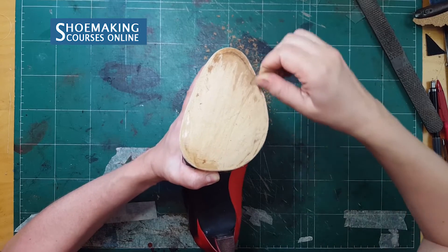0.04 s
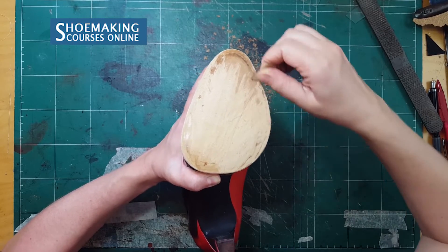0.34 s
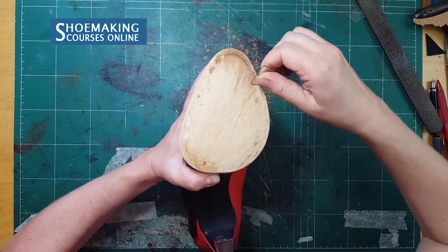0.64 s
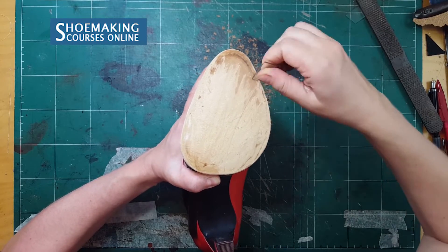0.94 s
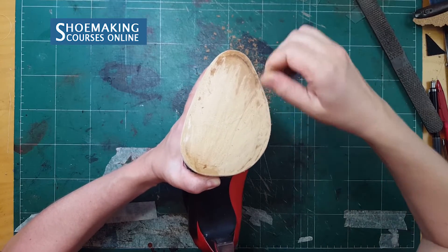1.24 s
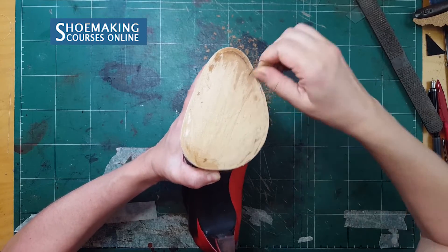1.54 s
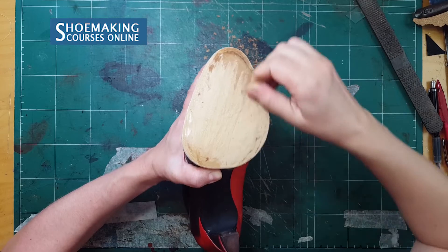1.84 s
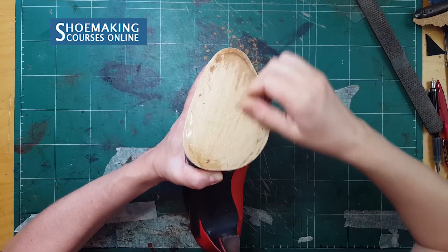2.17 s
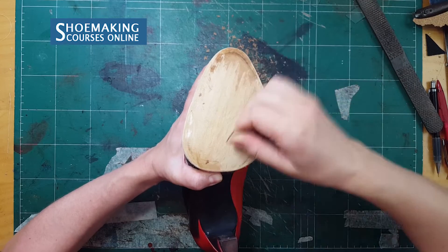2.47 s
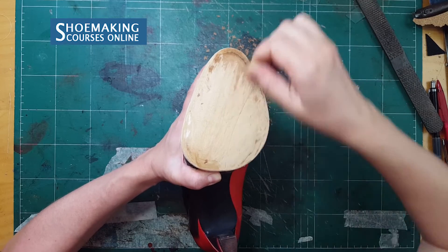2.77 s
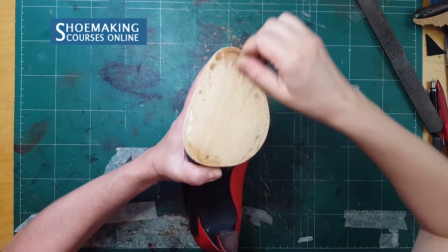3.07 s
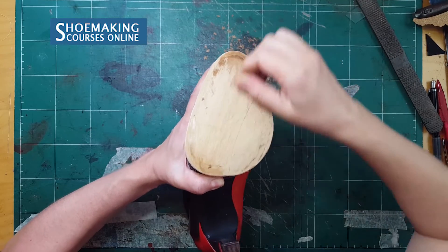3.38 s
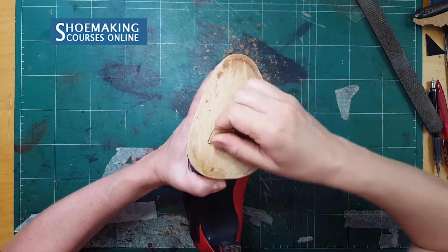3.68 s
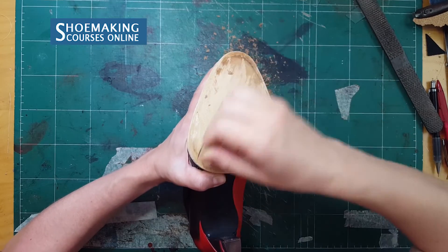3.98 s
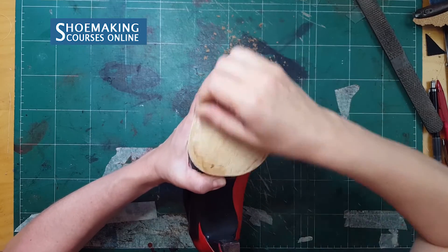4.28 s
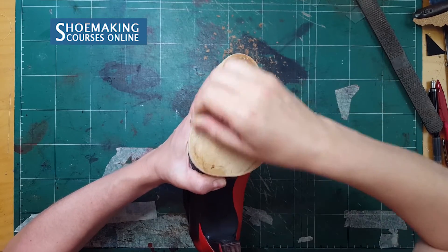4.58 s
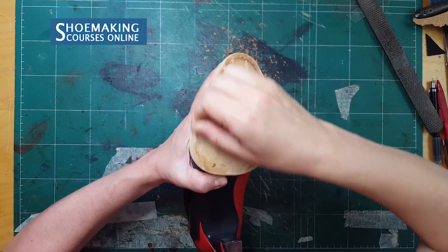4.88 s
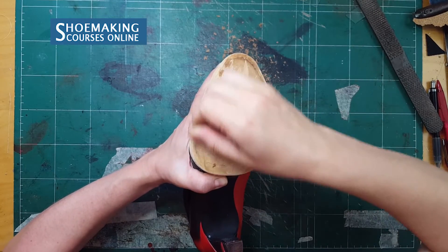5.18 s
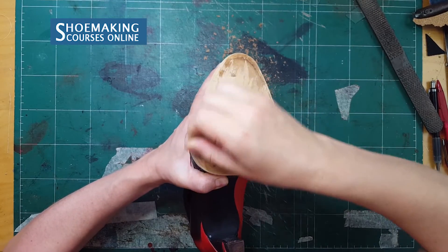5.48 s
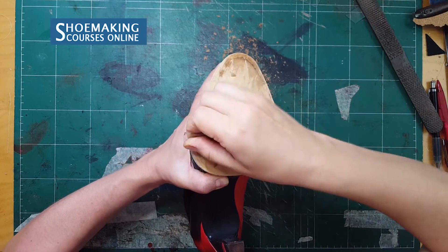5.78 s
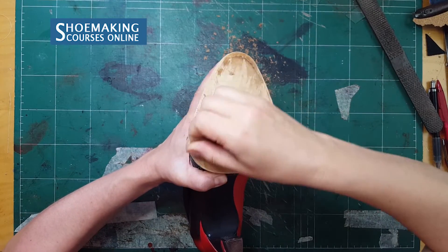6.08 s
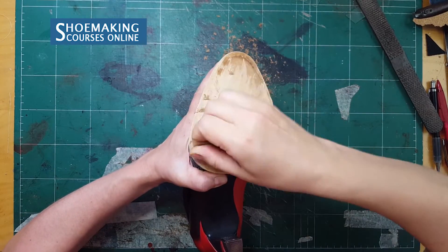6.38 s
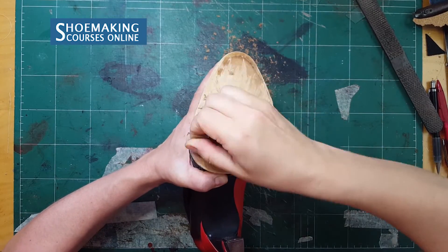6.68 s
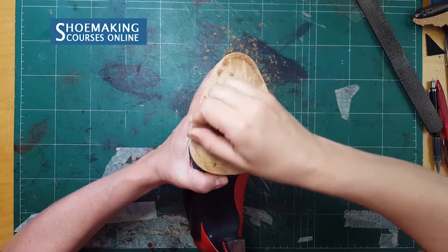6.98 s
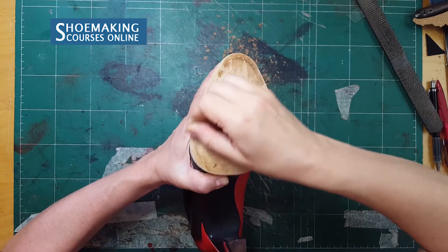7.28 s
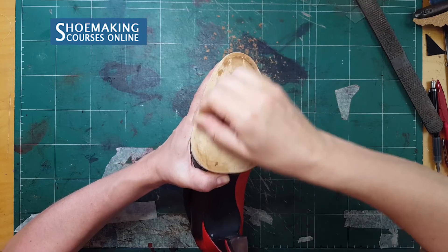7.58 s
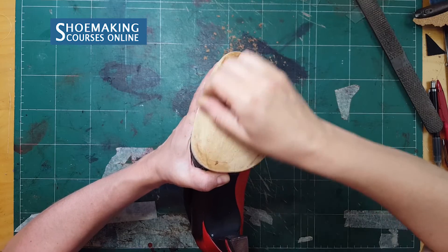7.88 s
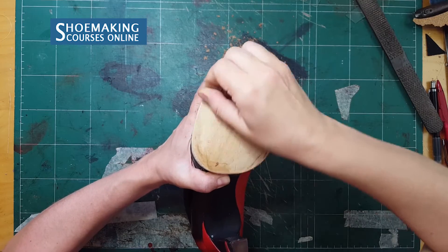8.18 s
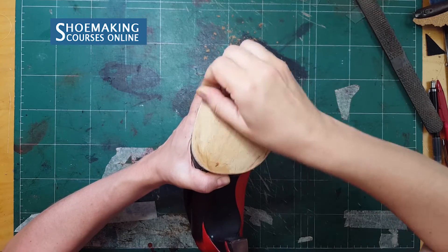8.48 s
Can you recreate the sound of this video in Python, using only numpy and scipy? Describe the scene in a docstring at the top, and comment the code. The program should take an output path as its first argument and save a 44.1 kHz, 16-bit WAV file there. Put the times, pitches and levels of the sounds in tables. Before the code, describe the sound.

Steady hand sanding of a shoe sole in a quiet workshop, about three short, gritty scrapes a second, each landing with a soft knock.

```python
"""In a quiet workshop, a small abrasive pad strokes the sole of a hand-held shoe about three times a second.
Each stroke lands with a tap and a thump. The grit bites and rasps as its grains catch and let go,
friction shakes the shoe, and the shoe springs back as the pad lifts off. The work moves from short
strokes at the toe to long ones down the edge, then onto the flat face of the sole."""
import sys
import numpy as np
from scipy import signal
from scipy.fft import rfft, irfft, next_fast_len
from scipy.io import wavfile
from scipy.ndimage import uniform_filter1d

SR = 44100
rng = np.random.default_rng(int(sys.argv[2]) if len(sys.argv) > 2 else 0)


def int16_out(signal):
    """Quantize to a 16-bit WAV file."""
    q = np.round(np.clip(np.atleast_2d(signal).T, -1, 1) * 32767)
    wavfile.write(sys.argv[1], SR, q.astype(np.int16))


N = 380583
TIME = np.arange(N) / SR
HZ = np.maximum(np.fft.rfftfreq(N, 1 / SR), 1)

# The strokes. Each row: landing time in seconds, tap strength in dB, thump strength in dB,
# time the grit bites in seconds, rub length in seconds, rasp strength in dB,
# pressure gained along the rub in dB, rebound strength in dB.
STROKES = [(0.002, -32, -50.5, 0.017, 0.1, -34, 0, -43.5), (0.297, -29.5, -46, 0.33, 0.09, -31.5, 0, -46),
           (0.584, -61.5, -56, 0.6238, 0.07, -37, 4, -41.5),
           (0.867, -49, -49.5, 0.9027, 0.088, -34.5, 0, -32),
           (1.154, -34.5, -44, 1.186, 0.092, -35, 5, -40),
           (1.434, -22, -44.5, 1.4677, 0.13, -33.5, -5.5, -47),
           (1.792, -37, -51.5, 1.818, 0.17, -34.5, 2.5, -75),
           (2.178, -21, -48.5, 2.209, 0.16, -31.5, 0.5, -55),
           (2.570, -28, -46.5, 2.608, .165, -30.5, 2, -49), (2.968, -20.5, -49, 2.995, 0.16, -29, 1, -40.5),
           (3.362, -14.5, -45, 3.389, 0.14, -27, 1, -41), (3.748, -23.5, -46, 3.784, 0.12, -29.5, 2.5, -42),
           (4.108, -26.5, -47.5, 4.135, 0.13, -34, 15, -46),
           (4.460, -22, -45.5, 4.493, 0.081, -30.5, 0, -38),
           (4.744, -25.5, -45.5, 4.788, 0.1, -35.5, 2, -60),
           (5.043, -45, -45.5, 5.079, 0.09, -33, -9.5, -41.5),
           (5.309, -46.5, -46, 5.345, 0.1, -35, -3, -36), (5.591, -50.5, -42.5, 5.630, 0.09, -34.5, 1, -49),
           (5.864, -48, -46, 5.903, 0.068, -38, -7.5, -44),
           (6.147, -45.5, -43, 6.178, 0.097, -33, -1.5, -38.5),
           (6.467, -36, -46.5, 6.494, 0.11, -32.5, 0.5, -51),
           (6.754, -51.5, -52, 6.788, 0.1, -30.5, -1.5, -40),
           (7.041, -39.5, -45.5, 7.077, 0.099, -32, 5.5, -37),
           (7.343, -32.5, -43, 7.362, 0.11, -35, 5.5, -36),
           (7.605, -43, -43.5, 7.639, 0.077, -34, -2.5, -40),
           (7.867, -37.5, -43.5, 7.891, 0.098, -32.5, 1, -38),
           (8.112, -52, -49.5, 8.151, 0.084, -34.5, 4, -44),
           (8.385, -55, -45.5, 8.417, 0.11, -35, -2, -36.5)]
# The pad on toe, edge and face. Each row: boost of its resonance in dB, its fall along a stroke in
# octaves, low mids in dB, their swell along a stroke in dB, treble in dB, pitch of a medium tap in Hz.
PAD_TONE = [(3, .18, -0.5, 4, -2.5, 1550), (7, 0.77, 4.5, 2.5, -0.2, 1140),
            (3.5, 0.65, 0.5, 12, -0.4, 1080)]
# The pad's resonance shifts as the fingers change grip. Each row: time in seconds, pitch in Hz.
GRIP_PITCH = [(0, 2130), (1.2, 1750), (1.5, 2500), (3.0, 2320), (3.4, 2160), (4.4, 1770), (5.1, 1843),
              (5.4, 2707), (6.8, 2340), (7.1, 1867), (8.6, 1940)]
def rasp(place, noise, level_db, width_octaves=0.45, flicker_db=2.5, medium_rasp_db=-32.5):
    """All rubs at one place. The pad's resonance sinks along each, and the low mids fill in as it grips."""
    boost_db, fall_octaves, low_db, swell_db, treble_db, _ = PAD_TONE[place]
    out = np.zeros(N)
    for stroke in STROKES:
        bite, length, rasp_db, lean_db = stroke[3:7]
        if place_of(bite) != place:
            continue
        force = pressure(bite, length, rasp_db, lean_db)
        on = np.flatnonzero(force)
        hz, t, frames = signal.stft(noise[on], SR, nperseg=256)
        hz = np.maximum(hz, 1)[:, None]
        along = np.clip(t / length, 0, 1) - .5
        grip_hz = np.interp(bite, *np.transpose(GRIP_PITCH))
        centre_hz = grip_hz * 2 ** (-(fall_octaves - 0.04 * lean_db) * along)
        db = boost_db * np.exp(-.5 * (np.log2(hz / centre_hz) / width_octaves) ** 2)
        low_mids = low_db + swell_db * along - .5 * (rasp_db - medium_rasp_db)  # harder sounds thinner
        db = db + treble_db / (1 + (4300 / hz) ** 6) + low_mids / (1 + (hz / 1000) ** 6)
        # contact patches come and go, each with its own range of pitch
        chance = rng.standard_normal((len(hz), 160))[:, :len(t)]
        patches = uniform_filter1d(uniform_filter1d(chance, size=5, axis=0), size=4, axis=1)
        db = db + flicker_db * rms_one(patches)
        out[on] += force[on] * signal.istft(frames * from_db(db))[1][:len(on)]
    return from_db(level_db) * out


# The hand's push on toe, edge and face. Each row: bite in dB against the crest, crest time as a share
# of the rub, lift-off in dB against the crest, first tick in dB against the rasp.
HAND_PUSH = [(-5, 0.64, -4.5, -7), (-6.5, 0.21, -0.95, -13), (-6, 0.47, -5, -9)]
def pressure(bite, length, rasp_db, lean_db, rise_s=0.012, rise_db=21, fall_s=0.089, fall_db=36):
    """The pad bites quickly, rides to a crest and eases off; the hand leans in or lets up on the way."""
    bite_db, crest, lift_db, _ = HAND_PUSH[place_of(bite)]
    start, lift = bite - 0.0029, bite + length
    times = [start, start + rise_s, bite + length * np.clip(crest, .25, .95), lift, lift + fall_s]
    on = span(times[0], times[-1])
    arch = np.interp(TIME[on], times, [bite_db - rise_db, bite_db, 0, lift_db, lift_db - fall_db])
    lean = lean_db * (np.clip((TIME[on] - bite) / length, 0, 1) - .5)
    # the pad grabs once more just before it lets go, more so when the hand leans in
    grab = np.clip(0.63 * lean_db, 0, 1.5) * np.exp(-.5 * ((TIME[on] - lift + 0.019) / 0.01) ** 2)
    out = np.zeros(N)
    out[on] = from_db(rasp_db + arch + lean + grab)
    return out


# The tone of the grit at each place. Each row: frequency in Hz, relative level in dB.
TOE_COLOUR = [(400.0, -7.5), (650.0, -7.5), (1000.0, -6.5), (1400.0, -10.5), (1900.0, -4.5),
              (2300.0, -12.5), (2900.0, -9), (3700.0, -10.5), (5500.0, -14.5), (7500.0, -13.5),
              (9800.0, -21.5), (13400.0, -13), (15000.0, -28), (15900.0, -23)]
EDGE_COLOUR = [(400.0, -12.5), (650.0, -7.5), (1000.0, -6.5), (1400.0, -4.5), (1900.0, -3), (2300.0, -2),
               (2900.0, -3), (3700.0, -6.5), (5500.0, -8.5), (7500.0, -11), (9800.0, -18), (13400.0, -8.5),
               (15000.0, -20), (15900.0, -22)]
FACE_COLOUR = [(400.0, -5.5), (650.0, -10.5), (1000.0, -6), (1400.0, -6.5), (1900.0, -3), (2300.0, -4.5),
               (2900.0, -2), (3700.0, -6.5), (5500.0, -10.5), (7500.0, -12), (9800.0, -17.5),
               (13400.0, -6.5), (15000.0, -16), (15900.0, -40)]
# Where pad and sole ring at each place. Each row: pitch in Hz, width in Hz, boost in dB.
TOE_RINGS = [(517, 57, 6), (1168, 20, 8.5), (1890, 290, 6.5), (2454, 160, 8)]
EDGE_RINGS = [(522, 29, 11.2), (1150, 7.6, 7), (1535, 26, 4.2), (1930, 54, 2.6), (2800, 160, 1.33)]
FACE_RINGS = [(520, 8.77, 15), (704, 41, 5.6), (1436, 136, 11.96), (2120, 12, 4.6), (2580, 160, 1.8),
              (3200, 57, 1.9)]
def sanding():
    """The pad rasps over toe, edge and face in turn."""
    toe = rasp(0, grit(TOE_COLOUR, TOE_RINGS), level_db=-4.5)
    edge = rasp(1, grit(EDGE_COLOUR, EDGE_RINGS), level_db=-6.5)
    face = rasp(2, grit(FACE_COLOUR, FACE_RINGS), level_db=-4.5)
    return toe + edge + face


def grit(colour, rings, grains_per_s=14000, size_db=1.2, clump_db=1.66, clump_hz=150):
    """Grains catch and let go in clumps; pad and sole colour their clicks."""
    grains = (rng.random(N) < grains_per_s / SR) * rng.standard_normal(N)
    grains *= from_db(size_db * np.minimum(rng.exponential(1, N), 4) + clump_db * drift(clump_hz))
    rings_db = sum(boost / (1 + (2 * (HZ - hz) / width) ** 2) for hz, width, boost in rings)
    spectrum = rfft(grains) * from_db(at_hz(colour, HZ) + rings_db) / np.sqrt(1 + (300 / HZ) ** 6)
    return irfft(spectrum, N) / np.std(irfft(spectrum * (HZ > 900), N))  # power 1 above 900 Hz


MEDIUM_TAP_DB, BURST_SAMPLES = -26, 2048
def taps(level_db=3, octaves_per_db=0.05, cycles=11, crunch_db=-14, crunch_t60=0.043):
    """The pad slaps the sole: two short tones, higher for a harder landing, and a crunch as it beds in."""
    out = np.zeros(N)
    hit = signal.unit_impulse(BURST_SAMPLES)
    for land, tap_db, *_ in STROKES:
        hz = PAD_TONE[place_of(land)][-1] * 2 ** (octaves_per_db * (tap_db - MEDIUM_TAP_DB))
        lower = ring(hit, hz * 0.84, cycles / hz)
        upper = from_db(-3) * ring(hit, hz * 1.655, cycles / hz)
        crunch = grit_burst(hz, crunch_db, crunch_t60, cycles=7.8)
        tap = soften(lower - upper + crunch, min(2 * hz, SR / 3))  # the soft pad rounds the blow
        add_at(out, land, from_db(tap_db + level_db) * tap)
    return out


def shoe():
    """The shoe is thumped as the pad lands, shakes while it rubs and springs back as it lifts."""
    land, _, thump_db, bite, length, _, _, rebound_db = np.transpose(STROKES)
    landings = thumps(land, thump_db + 10, build_t60=0.072, upper_db=3.5)
    rebounds = thumps(bite + length, rebound_db + 2.5, build_t60=0.065, upper_db=7)
    return landings + drag() + rebounds


# Low tones stirred by each tap and rub; the boom near 129 Hz is probably the room's resonance. Each row:
# pitch in Hz, ring time in seconds, relative level in dB when thumped, relative level in dB when dragged.
LOW_TONES = [(60, 0.2, -10, -16.5), (90.6, .12, -2, -10), (129.1, 0.26, 2, -10), (201, 0.21, -6.5, -1.5),
             (263.6, 0.16, -13, 1.5), (337, 0.15, -17, -6.5), (522, 0.11, -21, -15)]
def thumps(times, levels_db, build_t60, upper_db, softness_hz=700):
    """Soft pushes on the shoe stir the low tones, which take a moment to build up."""
    out = 0
    for k, (hz, t60, db, _) in enumerate(LOW_TONES):
        push = clicks(times, levels_db + db + upper_db * (k > 2) + rng.normal(0, 1.4, len(times)))
        tone = ring(push, hz, t60) - ring(push, hz, min(build_t60, t60 / 2))
        out = out + (-1) ** k * tone
    return soften(out, softness_hz)


# How freely the held shoe shakes. Each row: time in seconds, strength in dB.
SHOE_SHAKE = [(0, -56.5), (1.2, -45), (2.3, -57), (3.8, -56), (4.2, -49), (5.1, -50), (5.6, -42),
              (6.7, -47.5), (7.2, -40), (8.6, -45.5)]
def drag(thrum_db=-4.5, boom_db=-4, hollow_db=-4, pressed_hz=355, released_hz=220):
    """Friction shakes the shoe: a low boom sounds all through a rub, and a thrum swells in later."""
    thrum, boom, hollow_hz = np.zeros(N), np.zeros(N), np.full(N, float(pressed_hz))
    for _, _, _, bite, length, *_ in STROKES:
        on = span(bite - length, bite + 2 * length)
        along = (TIME[on] - bite) / length
        shake = from_db(np.interp(bite, *np.transpose(SHOE_SHAKE)))
        thrum[on] += shake * np.interp(along, [0.05, .6, 1.1, 1.4], [0, 1, 1, 0])
        boom[on] += shake * ((along >= -0.16) & (along < 1.3))
        # the contact softens as the hand eases off, so its hollow tone sinks
        hollow_hz[on] = np.interp(along, [.45, 1.25], [pressed_hz, released_hz])
    boom_tone = np.sqrt(2) * np.sin(2 * np.pi * LOW_TONES[2][0] * TIME + 0.84 * drift(2.8))
    out = from_db(boom_db) * boom * boom_tone
    out += from_db(hollow_db) * thrum * rough_tone(hollow_hz, waver_hz=18)
    for hz, t60, _, db in LOW_TONES:
        friction = rng.standard_normal(N)
        out += from_db(db + thrum_db) * ring(thrum * friction, hz, t60) / np.std(ring(friction, hz, t60))
    return out


def groans(level_db=-11, full_lean_db=5, gripped_hz=850, released_hz=640, half_length_s=0.044):
    """Where the hand leans in, the paper sticks and slips as the rub ends: a rough, sinking groan."""
    swell, hz = np.zeros(N), np.full(N, float(gripped_hz))
    for _, _, _, bite, length, rasp_db, lean_db, _ in STROKES:
        middle = bite + length - 0.01804  # just before the pad lifts
        on = span(middle - half_length_s, middle + half_length_s)
        along = (TIME[on] - middle) / half_length_s
        strength = from_db(rasp_db) * np.clip(lean_db / full_lean_db, 0, 2) ** .5
        swell[on] += strength * np.cos(np.pi / 2 * along) ** 2
        hz[on] = np.interp(along, [-1, 1], [gripped_hz, released_hz])
    return from_db(level_db) * swell * rough_tone(hz, waver_hz=55)


# Further ticks: extra catches as the strokes at 4.79 s and 5.08 s bite, then stray grains snapping and fingers
# shifting on the pad. Each row: start in seconds, strength in dB, pitch in Hz.
FURTHER_TICKS = [(2.894, -40, 964), (4.791, -15, 1910), (5.079, -19.5, 1700), (5.923, -45, 5500),
                 (6.078, -47.5, 3980), (6.409, -46, 4460)]
def ticks(level_db=-6, t60=0.012, catch_hz=2500):
    """Tiny bursts of grit ring the pad: one as each stroke bites, extra ones at two of the bites, and a few
    strays between strokes."""
    catches = [(bite, db + HAND_PUSH[place_of(bite)][3], catch_hz) for _, _, _, bite, _, db, *_ in STROKES]
    out = np.zeros(N)
    for start, db, hz in catches + FURTHER_TICKS:
        add_at(out, start, grit_burst(hz, db + level_db, t60, cycles=3.9))
    return out


def scuffs(level_db=-60, pitch_hz=3200, t60=0.053):
    """Grit scratches lightly as the pad settles, a little louder after a harder tap."""
    out = np.zeros(N)
    for land, tap_db, *_ in STROKES:
        db = level_db + 0.18 * (tap_db - MEDIUM_TAP_DB)
        add_at(out, land, grit_burst(pitch_hz, db, t60, cycles=1.1))
    return out


# Faint squeaks on return strokes. Each row: start in seconds, length in seconds, pitch in Hz, level in dB.
PAD_SQUEAKS = [(6.976, 0.087, 2130, -66), (7.764, 0.14, 2450, -60.5)]
def squeaks(waver_hz=70):
    """The pad lightly sticks and slips: a thin, wavering whistle that swells and fades."""
    out = 0
    for start, length, hz, db in PAD_SQUEAKS:
        swell = np.sin(np.pi * np.clip((TIME - start) / length, 0, 1))
        out = out + from_db(db) * swell * np.sin(2 * np.pi * hz * TIME + 2 * drift(waver_hz))
    return out


def rustle(level_db=-83, flexes_per_s=70, size_db=3, pitch_hz=4200, t60=0.00059):
    """The abrasive paper crackles faintly in the fingers the whole time."""
    flexes = (rng.random(N) < flexes_per_s / SR) * rng.standard_normal(N)
    flexes *= from_db(size_db * np.minimum(rng.exponential(1, N), 3))
    return from_db(level_db) * rms_one(ring(flexes, pitch_hz, t60))


def moving(sound, echo_db, place_lead_us=(-12, -3.5, 24.5), wander_us=11):
    """Hand and shoe shift, so each stroke comes from a new angle and meets different reflections."""
    out = np.zeros((2, N + SR))
    edges = [0] + [round(stroke[0] * SR) for stroke in STROKES[1:]] + [N]
    for first, last in zip(edges, edges[1:]):
        # extra head start at the left microphone, in microseconds
        lead_us = place_lead_us[place_of(first / SR)] + wander_us * rng.standard_normal()
        heard = workshop(sound[first:last], echo_db, lead_us)
        out[:, first:first + heard.shape[1]] += heard
    return out[:, :N]


# The room's echo. Each row: frequency in Hz, fade time in seconds, relative level in dB,
# how alike left and right are from 0 to 1.
ROOM_ECHO = [(99, 0.36, -12.5, 0.5), (390, 0.19, -3, 0.65), (1210, 0.16, -4.5, 0), (3040, 0.2, -7.5, 0.11),
             (6900, 0.21, -7.5, 0.082), (14100, 0.23, -16, 0.085)]
# A very short smear that roughens and widens the treble, strongest near 8 kHz.
# Each row: frequency in Hz, level in dB against the direct sound.
TREBLE_SMEAR = [(200, -28), (1000, -16), (2500, -9), (4500, -4), (8000, 21), (14000, -11)]
# How much louder the left microphone is. Each row: frequency in Hz, left minus right in dB.
LEFT_LOUDER = [(60, -1), (200, 4.5), (500, 2.4), (1200, 2), (2400, 2.5), (3400, -0.5), (6000, 1.4),
               (8100, -3.5), (9600, 13), (11000, 7), (13200, 3), (15500, 17.5)]
# How far ahead the left microphone is. Each row: frequency in Hz, lead in radians.
LEFT_LEAD = [(60, -1), (2400, 0.72), (3700, 1.13), (5000, 2), (7000, 3.5), (9000, 8.5), (11000, 9.5),
             (14000, 8)]
def workshop(sound, echo_db, lead_us=0, gap_s=0.0048, smear_t60=0.037):
    """The direct sound at two microphones, with a short smear and an echo that fades band by band."""
    size = SR // 2
    t, hz = np.arange(size) / SR, np.maximum(np.fft.rfftfreq(size, 1 / SR), 1)
    mid, side = rfft(rng.standard_normal((2, size)))
    alike = np.clip(at_hz(ROOM_ECHO, hz, column=3), 0, 1)
    noise = np.sqrt((1 + alike) / 2) * mid + np.sqrt((1 - alike) / 2) * side * [[1], [-1]]
    echo = 0
    for k, (_, t60, db, _) in enumerate(ROOM_ECHO):
        band = np.interp(np.log(hz), np.log(np.array(ROOM_ECHO)[:, 0]), np.eye(len(ROOM_ECHO))[k])
        decay = from_db(-60 * t / t60) * (t > gap_s)
        echo = echo + irfft(noise * band, size) * decay / np.linalg.norm(decay) * from_db(db + echo_db)
    sides = np.array([[.5], [-.5]])
    direct = np.exp(1j * sides * (at_hz(LEFT_LEAD, hz) + 2 * np.pi * hz * lead_us / 1e6))
    smear = rng.standard_normal((2, size)) * from_db(-60 * t / smear_t60)
    smear_gain = from_db(at_hz(TREBLE_SMEAR, hz))
    early = direct + smear_gain * rfft(smear) / np.linalg.norm(smear[0])
    pair = rfft(echo) + early / np.hypot(1, smear_gain)
    pan = from_db(sides * at_hz(LEFT_LOUDER, hz))
    echo_power = from_db(at_hz(ROOM_ECHO, hz, column=2) + echo_db) ** 2
    pair *= pan / np.sqrt(np.mean(pan ** 2, axis=0) * (1 + echo_power))  # keeps the overall loudness
    lead_in = 32  # samples of room for the side that hears it first
    response = np.roll(irfft(pair, size), lead_in, axis=1)
    return signal.fftconvolve(sound[None], response, axes=1)[:, lead_in:]


# The tone of the quiet room. Each row: frequency in Hz, relative level in dB.
AIR_COLOUR = [(40, 2.5), (150, -8), (500, -25), (2000, -28.5), (8000, -19.5), (15000, -32)]
def still_air(level_db=-86.5):
    """The air makes a very faint, steady rumble and hiss."""
    spectrum = rfft(rng.standard_normal((2, N))) * from_db(at_hz(AIR_COLOUR, HZ))
    return from_db(level_db) * rms_one(irfft(spectrum, N))


def place_of(seconds, moves_s=(1.75, 4.7)):
    """Where the pad is: 0 on the toe, 1 on the edge, 2 on the face."""
    return int(np.searchsorted(moves_s, seconds))


def grit_burst(hz, db, t60, cycles):
    """A short, fading scratch of noise around one pitch."""
    noise = rms_one(ring(rng.standard_normal(BURST_SAMPLES), hz, cycles / hz))
    return noise * from_db(db - 60 * TIME[:BURST_SAMPLES] / t60)


def rough_tone(hz, waver_hz):
    """A gliding tone that wavers at random."""
    phase = 2 * np.pi * np.cumsum(hz) / SR
    return drift(waver_hz) * np.sin(phase) + drift(waver_hz) * np.cos(phase)


def drift(rate_hz, step=16):
    """A smooth random wander, about 1 in size."""
    size = next_fast_len(N // step + 2)
    hz = np.fft.rfftfreq(size, step / SR)
    slow = irfft(rfft(rng.standard_normal(size)) / (1 + (hz / rate_hz) ** 2), size)
    return rms_one(np.interp(np.arange(N) / step, np.arange(size), slow))


def ring(force, hz, t60):
    """Each push starts a tone that fades by 60 dB in t60 seconds."""
    decay, turn = from_db(-60 / (t60 * SR)), 2 * np.pi * hz / SR
    return signal.lfilter([0, np.sin(turn)], [1, -2 * decay * np.cos(turn), decay * decay], force + 1e-18)


def clicks(times, db):
    out = np.zeros(N)
    out[np.clip(np.round(times * SR).astype(int), 0, N - 1)] = from_db(db)
    return out


def soften(sound, cutoff_hz):
    return signal.sosfilt(signal.butter(2, cutoff_hz, fs=SR, output="sos"), sound)


def add_at(out, start_s, sound):
    at = round(start_s * SR)
    out[at:at + len(sound)] += sound


def span(start_s, end_s):
    return slice(*np.searchsorted(TIME, [start_s, end_s]))


def at_hz(rows, hz, column=1):
    """Read a table's column smoothly between its frequencies."""
    rows = np.array(rows)
    return np.interp(np.log(hz), np.log(rows[:, 0]), rows[:, column])


def from_db(db):
    return 10 ** (np.asarray(db) / 20)


def rms_one(sound):
    return sound / np.sqrt(np.mean(sound ** 2) + 1e-20)


def scene():
    """Two separate layers of the same rasp, each with its own reflections, give a wider sound."""
    first_layer = moving(sanding() + scuffs() + ticks(), echo_db=3)
    second_layer = moving(sanding() + groans() + squeaks() + rustle(), echo_db=2.5)
    slaps = workshop(taps(), echo_db=0.5)[:, :N]
    body = workshop(shoe(), echo_db=-3)[:, :N]
    return first_layer + second_layer + slaps + body + still_air()


# Sound fainter than this is hushed. Each row: frequency in Hz, threshold in dB per Hz.
HUSH_BELOW = [(50, -87), (130, -80), (260, -85.5), (800, -102), (2000, -113), (6000, -122), (15000, -124)]
def noise_suppressor(sound, depth_db=-22):
    """Bands of pitch that sink below the threshold are turned down."""
    framing = dict(nperseg=1024, noverlap=768, scaling="psd")
    hz, _, frames = signal.stft(sound, SR, **framing)
    power = uniform_filter1d(np.mean(np.abs(frames) ** 2, axis=0), size=5, axis=0)
    threshold = from_db(at_hz(HUSH_BELOW, np.maximum(hz, 1)))[:, None] ** 2
    over = (power / threshold) ** 2
    gain = (over + from_db(depth_db)) / (over + 1)
    return signal.istft(frames * gain, SR, **framing)[1][:, :N]


def record(dry):
    """The pauses are hushed and the treble is cut steeply above 15800 Hz."""
    return signal.sosfilt(signal.ellip(10, .2, 70, 15800, fs=SR, output="sos"), noise_suppressor(dry))


dry = scene()
out = record(dry)
int16_out(out)
```